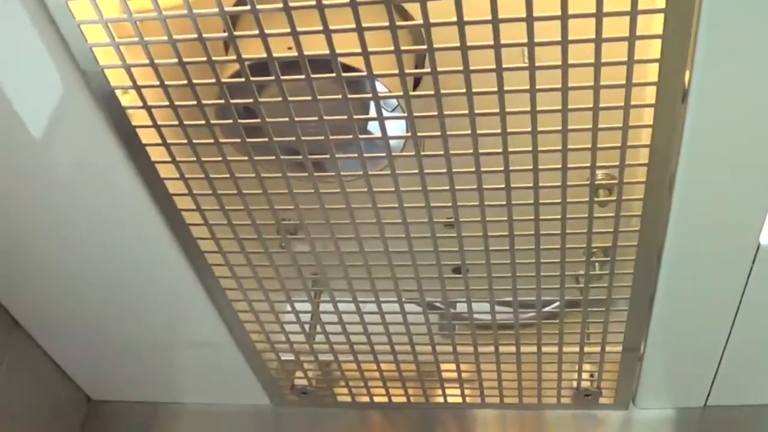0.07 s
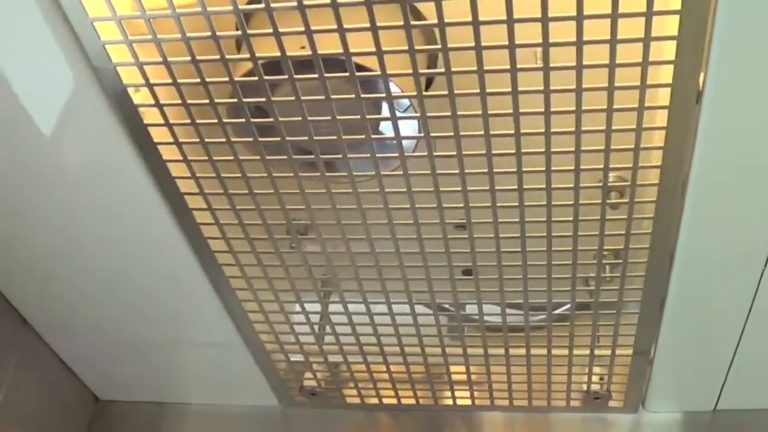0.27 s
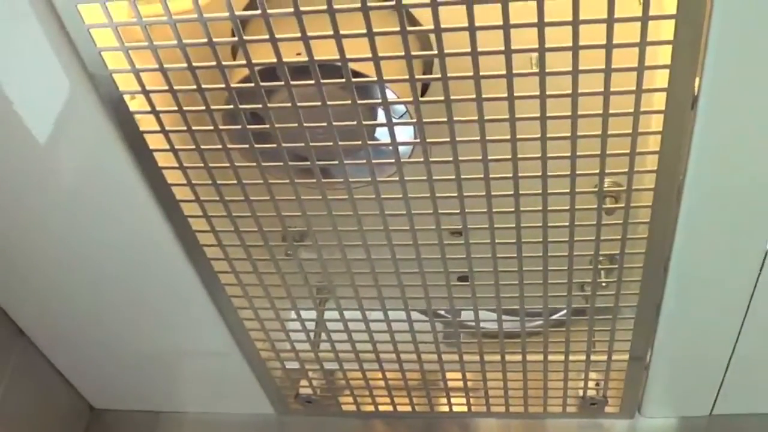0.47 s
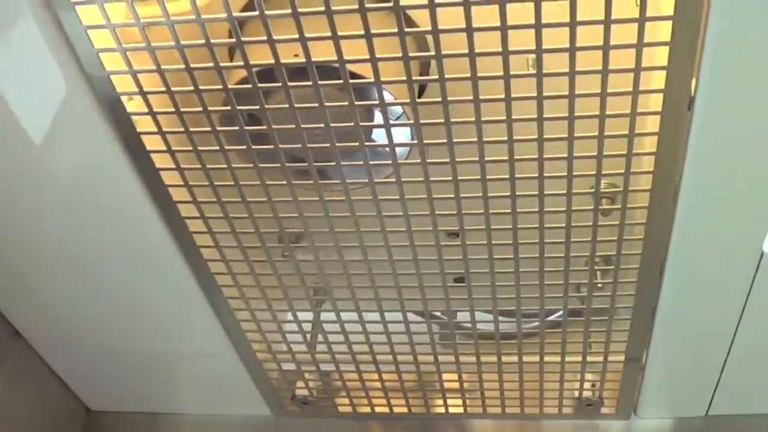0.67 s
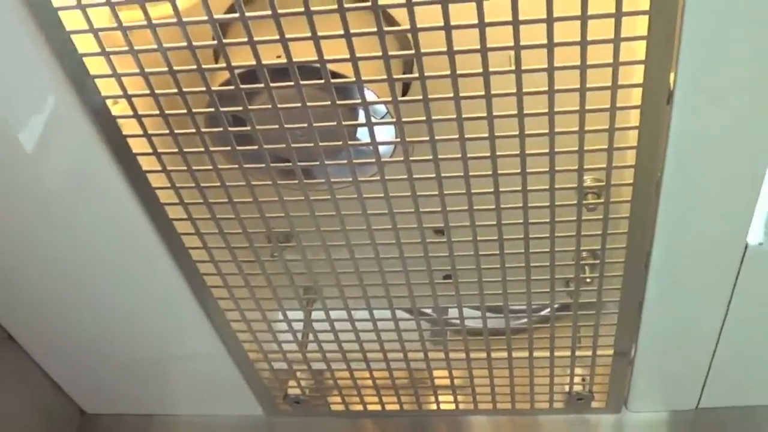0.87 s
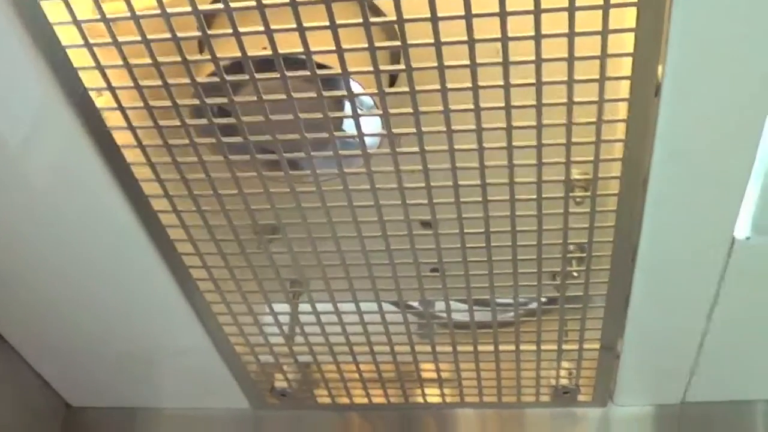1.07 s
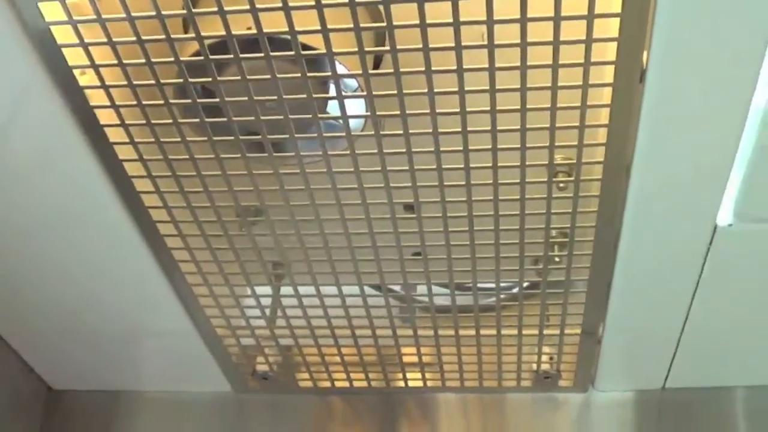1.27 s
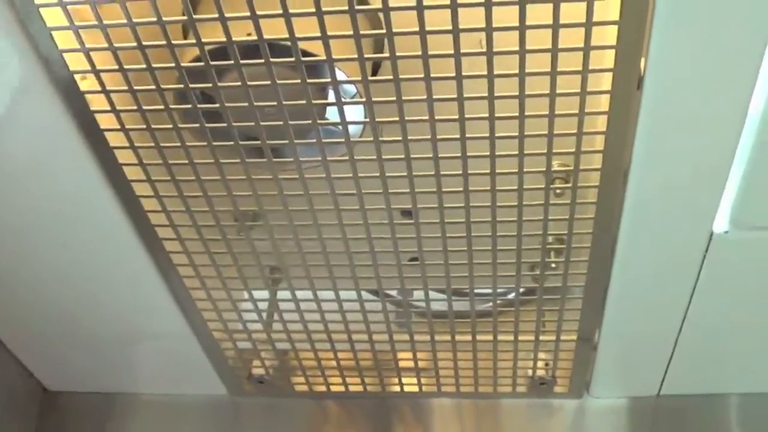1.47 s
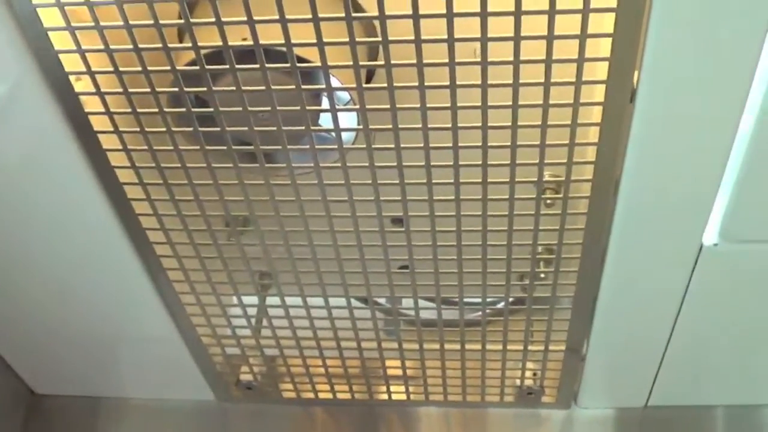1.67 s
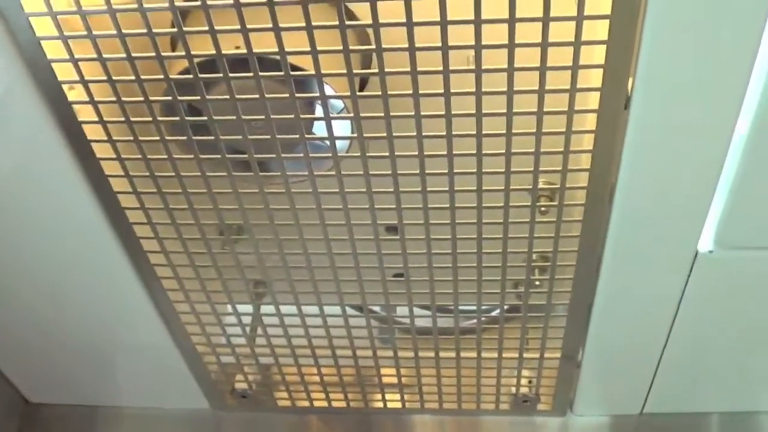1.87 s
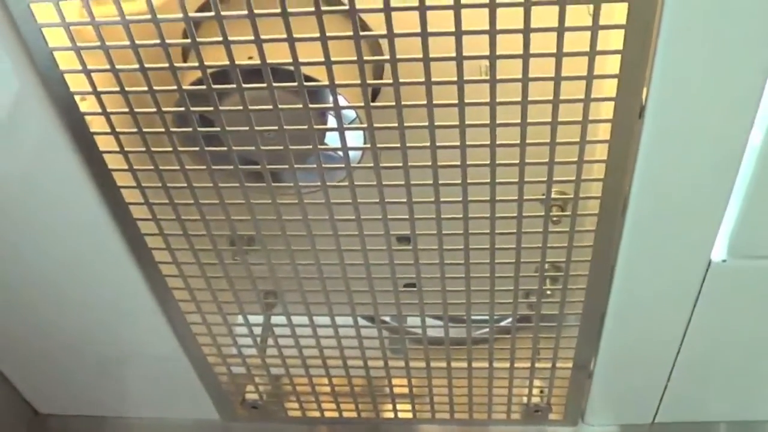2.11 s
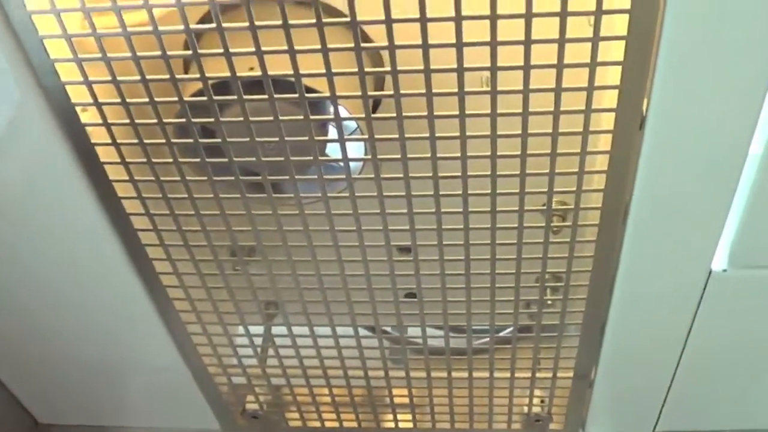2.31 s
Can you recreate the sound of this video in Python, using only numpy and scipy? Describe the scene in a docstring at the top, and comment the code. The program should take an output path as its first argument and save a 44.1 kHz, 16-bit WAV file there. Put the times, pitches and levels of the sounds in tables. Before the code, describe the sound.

Elevator mechanism lets go with a rattling metal clack, followed by humming and a few clicks.

```python
"""Steel lift cabin setting off

Over a bed of rumble, sliding hiss and thin electrical whine, the machinery lets go with a rattling
clack: wall panels boom, the frame rings, the shaft echoes. Metal rubs out a brief squeak and the drive
swells to a low hum. Later a small catch close by ticks and snaps in a quick run of dry clicks."""
import sys
import numpy as np
from scipy import signal
from scipy.io import wavfile

SR = 44100
rng = np.random.default_rng(int(sys.argv[2]) if len(sys.argv) > 2 else 0)


def transcribe(signal):
    """Save signal, clipped to [-1, 1], as a 16-bit WAV file at the path in sys.argv[1]."""
    frames = np.atleast_2d(signal).T
    limited = np.clip(frames, -1, 1)
    pcm = np.round(limited * 32767).astype(np.int16)
    wavfile.write(sys.argv[1], SR, pcm)


N = 108045
TIME = np.arange(N) / SR

# colour of the rumble: f/Hz, relative density/dB
RUMBLE_SPECTRUM = [(25, -21), (60, 1), (95, -2), (150, 3), (190, -2.5), (250, -12.5), (350, -7), (600, -8),
                   (1200, -19), (3000, -37.5)]
# resonances the ride keeps humming: f/Hz, width/Hz, level before the swell/dB
DRONES = [(94, 14, -48.5), (146.8, 5.9, -57.5), (344, 36, -58)]
# fader on rumble and drones: t/s, gain/dB
RUMBLE_SWELL = [(0, 3.5), (.2, 2.5), (.55, 5), (.8, 4), (1.05, 1.5), (1.4, -1), (1.75, 0), (2.05, -1.5),
                (2.3, -0.5), (2.45, -5.5)]
# colour of the sliding hiss: f/Hz, relative density/dB
HISS_SPECTRUM = [(400, -8.5), (1100, 4), (1600, 2), (2300, 1), (4500, -0.5), (7000, -2), (9500, -3),
                 (11500, -7.5), (14000, -9), (16000, -16)]
# fader on the hiss: t/s, level/dB
HISS_SWELL = [(0, -52.5), (.12, -47.5), (.4, -49), (.56, -48), (.61, -43.5), (.7, -49), (.97, -52),
              (1.25, -48.5), (1.42, -54), (1.7, -53), (1.9, -53), (2.02, -51.5), (2.1, -45), (2.2, -53),
              (2.37, -49), (2.45, -51)]
# stereo image of rumble and hiss: f/Hz, left-right likeness/0-1
BED_LIKENESS = [(50, 1), (200, 0.71), (500, 0.18), (2000, 0.25), (6000, 0.61), (8500, 0.89), (11000, 1)]
# pitch and weight of the drive's hum: t/s, f/Hz, rms level/dB
DRIVE_HUM = [(0, 36.7, -50), (.42, 36.3, -58), (.62, 35.71, -44.5), (.84, 37.2, -36), (1.0, 38.6, -35),
             (1.44, 38.06, -35.5), (1.52, 38.63, -38.5), (2.0, 37.86, -37), (2.45, 38.9, -36.5)]
# blows of the mechanism: t/s, level/dB
BLOWS = [(0.2105, -14.5), (0.231, -32), (0.299, -30), (.435, -50)]
# colour of their clatter: f/Hz, relative density/dB
CLATTER_SPECTRUM = [(50, 13.5), (130, 16), (300, 10), (420, 9.5), (600, 4), (780, 1), (1150, -2.5),
                    (1700, -1.5), (3800, -3.5), (5200, -3), (8500, -2.5), (12000, -9.5), (16000, -17)]
# its attack: f/Hz, rise/s
CLATTER_RISE = [(100, 0.0077), (500, 0.028), (1200, 0.015), (4000, 0.0054), (12000, 0.0032)]
# its decay: f/Hz, t60/s
CLATTER_T60 = [(100, 0.2), (400, 0.37), (1200, 0.58), (3000, 0.32), (8000, 0.2), (15000, 0.23)]
# echo of the shaft: f/Hz, level against the clatter/dB
SHAFT_ECHO = [(100, -8), (500, -12), (2500, -13.5), (8000, -37), (15000, -40)]
# stereo image of clatter and panels: f/Hz, left-right likeness/0-1
CLACK_LIKENESS = [(60, .9), (150, 0.95), (350, 0.07), (700, 0.6), (1500, 0.83), (3000, 0.77), (5500, 0.45),
                  (10000, 1)]
# early reflections in the cabin: delay/s, signed gain
WALL_REFLECTIONS = [(.0031, .17), (.0053, -.17), (.0089, .17), (0.0142, .17)]
# booming wall panels: f/Hz, rms level at the crest/dB, t60/s, rise/s
PANEL_MODES = [(35, -34, .45, 0.081), (81.4, -25, .55, 0.055), (123, -30.5, 0.94, 0.02),
               (152.6, -23, 0.79, 0.068), (179.2, -27, 0.8, 0.01), (208, -25, 0.99, 0.038),
               (302, -29.5, 0.55, 0.15), (327.2, -27, 0.67, 0.027), (333.8, -35.5, 1, 0.082),
               (482.6, -31.5, 0.32, 0.033), (584.5, -39, 0.99, 0.029), (637, -45, 0.99, 0.0094),
               (935, -38, 0.59, 0.0052), (1018, -32.5, 0.44, 0.0046), (1202, -29, 0.26, 0.008)]
# ring of the steel frame: f/Hz, relative level/dB
FRAME_MODES = [(1083, -36), (1160, -37), (1640, -37.5), (1713, -45), (1787, -61), (1950, -48), (2245, -42),
               (2331, -41.5), (3628, -46.5), (4032, -46)]
# partials of the squeak: f/Hz, relative level/dB
SQUEAK_MODES = [(3250, -52), (6165, -52), (6775, -53), (9150, -56), (9563, -49), (12400, -62)]
# rubs that sound them: t/s, half length/s, gain/dB, tilt/dB per octave
RUBS = [(0.614, 0.032, 1, 0), (0.67, 0.0066, 7, -20)]
# contacts of the catch: t/s, gain/dB, high cut/Hz, low cut/Hz, body ring/dB
CLICKS = [(1.355, -29, 8500, 4500, -4), (1.5621, -30.5, 10800, 1700, 1), (1.564, -23.5, 6400, 1490, -3),
          (1.728, -26.5, 3770, 500, 2), (1.7303, -20, 12700, 660, 3), (1.7419, -22, 4000, 900, -3),
          (1.7441, -17, 12500, 700, 1), (1.7523, -15.5, 6500, 1290, 0), (1.7744, -31.5, 10000, 1500, -15)]
# body of the catch: f/Hz, relative level/dB, t60/s
CATCH_MODES = [(917, -14.5, 0.045), (1275, -15, 0.034), (1830, -21, .03), (2180, -14.5, 0.029),
               (3055, -11, 0.017), (4480, -10.5, 0.01), (6900, -42, 0.009), (7830, -11.5, .012),
               (9980, -15, 0.016)]


def from_db(db):
    """Decibels to gain."""
    return 10 ** (np.asarray(db) / 20)


def rms_one(x):
    """Scale to rms 1."""
    return x / np.sqrt(np.mean(x ** 2) + 1e-20)


def in_time(rows):
    """Each column of an automation curve at every sample."""
    times, *columns = np.transpose(rows)
    return [np.interp(TIME, times, column) for column in columns]


def at_hz(points, hz):
    """Read a table on a log-frequency axis."""
    freqs, values = np.transpose(points)
    return np.interp(np.log(hz), np.log(freqs), values)


def drift(rate_hz, hop=40, warm_up=2000):
    """Smooth random wobble, rms about 1."""
    pole = np.exp(-2 * np.pi * rate_hz * hop / SR)
    white = rng.standard_normal(N // hop + warm_up + 2)
    slow = signal.lfilter([1], [1, -2 * pole, pole * pole], white)[warm_up:]
    return np.interp(np.arange(N) / hop, np.arange(len(slow)), rms_one(slow))


def struck(start, rise, t60):
    """Envelope: straight attack, then exponential decay."""
    age = TIME - start
    return np.clip(age / rise, 0, 1) * np.exp(-np.log(1000) * np.maximum(age - rise, 0) / t60)


def stereo(pair, likeness):
    """Two unrelated noises as mid and side; likeness 1 is mono, 0 is wide."""
    mid = np.sqrt(1 + likeness) * pair[0]
    side = np.sqrt(1 - likeness) * pair[1]
    return np.array([mid + side, mid - side]) / np.sqrt(2)


def bands(spectrum, likeness):
    """Yield (Hz, stereo noise) in bands that add up to the spectrum at an rms near 1."""
    edges = np.geomspace(25, 17000, 25)
    centres = np.sqrt(edges[1:] * edges[:-1])
    gains = from_db(at_hz(spectrum, centres)) * np.sqrt(np.diff(edges))
    gains /= np.linalg.norm(gains)
    white = rng.standard_normal((2, 2, N))
    for k, hz in enumerate(centres):
        bandpass = signal.butter(2, edges[k:k + 2], "band", fs=SR, output="sos")
        pair = rms_one(signal.sosfilt(bandpass, white[k % 2]))
        yield hz, gains[k] * stereo(pair, at_hz(likeness, hz))


def resonance(hz, width_hz):
    """A narrow resonance under random excitation, rms about 1."""
    phase = 2 * np.pi * hz * TIME
    return (drift(width_hz) * np.cos(phase) + drift(width_hz) * np.sin(phase)) / np.sqrt(2)


def ride_rumble(noise_db=-49):
    """The ride rumbles and keeps a few resonances droning, strongest as the car starts."""
    swell_db, = in_time(RUMBLE_SWELL)
    rumble = from_db(noise_db) * sum(noise for _, noise in bands(RUMBLE_SPECTRUM, BED_LIKENESS))
    drones = sum(from_db(db) * resonance(hz, width) for hz, width, db in DRONES)
    return from_db(swell_db) * (rumble + drones)


def sliding_hiss(flicker_hz=15):
    """A sliding hiss swells and sinks, each band flickering faintly on its own."""
    swell_db, = in_time(HISS_SWELL)
    hiss = sum(noise * from_db(drift(flicker_hz)) for _, noise in bands(HISS_SPECTRUM, BED_LIKENESS))
    return from_db(swell_db) * hiss


def drive_hum():
    """The drive's deep tone, faint at first, fills out and lifts slightly in pitch."""
    hz, db = in_time(DRIVE_HUM)
    return np.sqrt(2) * from_db(db) * np.sin(2 * np.pi * np.cumsum(hz) / SR)


def electrical_whine(hz=15625, level_db=-57, spread_db=3):
    """A thin, very high electrical whine."""
    level = from_db(level_db + spread_db * drift(rate_hz=30))
    return np.sqrt(2) * level * np.sin(2 * np.pi * hz * TIME)


def clack(shaft_t60_s=1.46, rattle_db=2):
    """Blows set countless steel modes clattering; the treble dies early and the shaft echoes on."""
    rattle = from_db(rattle_db * drift(rate_hz=150))
    out = 0
    for hz, noise in bands(CLATTER_SPECTRUM, CLACK_LIKENESS):
        rise, t60 = at_hz(CLATTER_RISE, hz), at_hz(CLATTER_T60, hz)
        echo_send = from_db(at_hz(SHAFT_ECHO, hz))
        power = 0
        for start, db in BLOWS:
            direct = struck(start, rise, t60)
            echo = echo_send * struck(start, rise, shaft_t60_s)
            power += from_db(db) ** 2 * (direct ** 2 + echo ** 2)
        out += noise * np.sqrt(power)
    return out * rattle


def cabin_walls(dry):
    """Close walls comb the sound, keeping about the same power."""
    wet = sum(gain * np.array([np.interp(TIME - delay, TIME, side, left=0) for side in dry])
              for delay, gain in WALL_REFLECTIONS)
    return (dry + wet) / np.sqrt(1 + sum(gain ** 2 for _, gain in WALL_REFLECTIONS))


def floor_thump(hz=148.4, peak_db=-14, rise_s=0.013, t60_s=0.073):
    """The first blow shoves the cabin floor: a short, low punch."""
    start = BLOWS[0][0]
    return from_db(peak_db) * struck(start, rise_s, t60_s) * np.sin(2 * np.pi * hz * (TIME - start))


def panel_boom():
    """The first blow blooms into the modes of the wall panels, widened by a phase offset between ears."""
    start = BLOWS[0][0]
    out = 0
    for k, (hz, db, t60, rise) in enumerate(PANEL_MODES):
        offset = (-1) ** k * np.arccos(at_hz(CLACK_LIKENESS, hz))
        phase = 2 * np.pi * hz * (TIME - start) + offset * np.array([[.5], [-.5]])
        out += np.sqrt(2) * from_db(db) * struck(start, rise, t60) * np.sin(phase)
    return out


def frame_ring(gain_db=4, rise_s=0.0063, t60_s=0.6, spread_rad=.4):
    """Partials of the steel frame ring out of the clatter, with a different phase at each ear."""
    ring = 0
    for hz, db in FRAME_MODES:
        phase = 2 * np.pi * (hz * TIME + rng.random())
        ring += from_db(db) * np.sin(phase + spread_rad * rng.standard_normal((2, 1)))
    return from_db(gain_db) * struck(BLOWS[0][0], rise_s, t60_s) * ring


def squeak(width_hz=33):
    """Metal rubs on metal as the car starts: a bright scrape, then a short, darker chirp."""
    out = 0
    for hz, db in SQUEAK_MODES:
        octaves_up = np.log2(hz / SQUEAK_MODES[0][0])
        for centre, half_length, rub_db, tilt in RUBS:
            rub = np.exp(-.5 * ((TIME - centre) / half_length) ** 2)
            out += from_db(db + rub_db + tilt * octaves_up) * rub * resonance(hz, width_hz)
    return out


def catch_clicks(rise_s=0.00011, crack_db=2, tail_db=-16.5, pan_right_db=1.8):
    """Each contact is a crack, a short ring of the catch's body and a faint dull tail from the walls."""
    wall_damping = signal.butter(2, 4570, fs=SR, output="sos")
    out = 0
    for start, db, high_cut_hz, low_cut_hz, ring_db in CLICKS:
        noise = stereo(rng.standard_normal((2, N)), likeness=0.47)
        body = 0
        for k, (hz, mode_db, t60) in enumerate(CATCH_MODES):
            tone = (-1) ** k * np.sin(2 * np.pi * hz * (TIME - start))
            body += from_db(mode_db + ring_db) * struck(start, rise_s, t60) * tone
        crack = from_db(crack_db) * struck(start, rise_s, t60=0.0085) * noise
        tail = from_db(tail_db) * struck(start, rise_s, t60=0.16) * signal.sosfilt(wall_damping, noise)
        high_cut = signal.butter(4, high_cut_hz, fs=SR, output="sos")
        low_cut = signal.butter(2, low_cut_hz, "high", fs=SR, output="sos")
        out += from_db(db) * signal.sosfilt(np.vstack([high_cut, low_cut]), body + crack + tail + 1e-18)
    return out * from_db(pan_right_db * np.array([[-.5], [.5]]))


def scene():
    """The mix in the cabin; only the clack goes through the walls' comb."""
    clatter = cabin_walls(clack())
    bed = ride_rumble() + sliding_hiss()
    body = floor_thump() + panel_boom() + frame_ring()
    return clatter + bed + body + squeak() + drive_hum() + electrical_whine() + catch_clicks()


def record(dry, cutoff_hz=16000):
    """A steep high cut on the whole mix."""
    return signal.sosfiltfilt(signal.ellip(10, .05, 70, cutoff_hz, fs=SR, output="sos"), dry)


dry = scene()
out = record(dry)
transcribe(out)
```